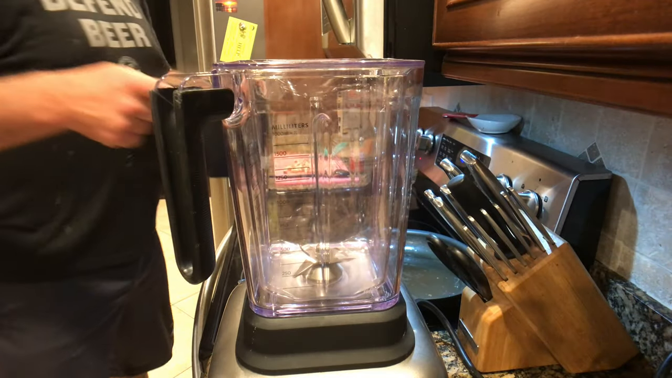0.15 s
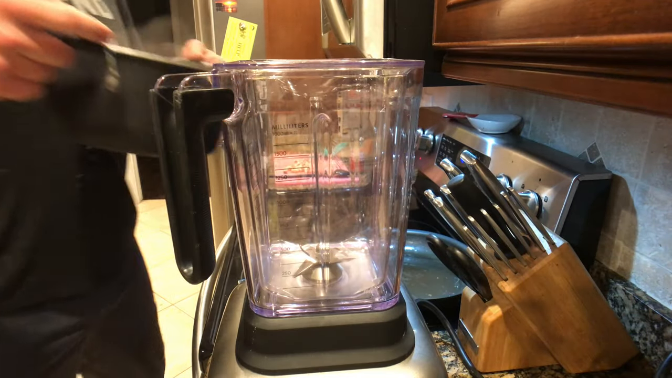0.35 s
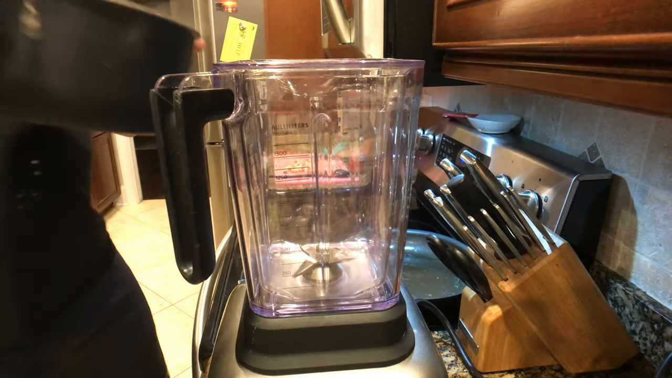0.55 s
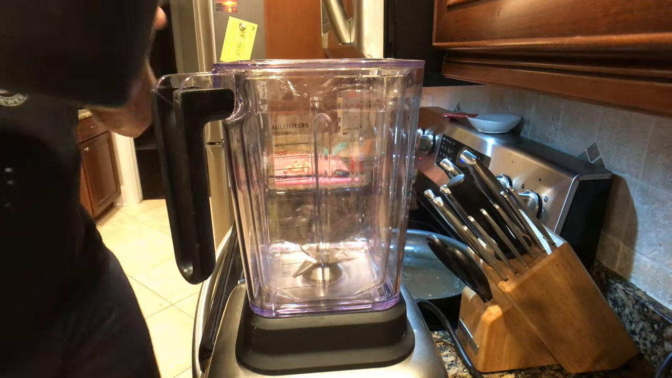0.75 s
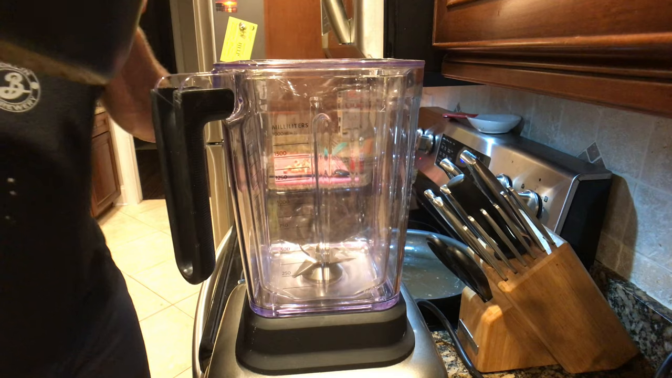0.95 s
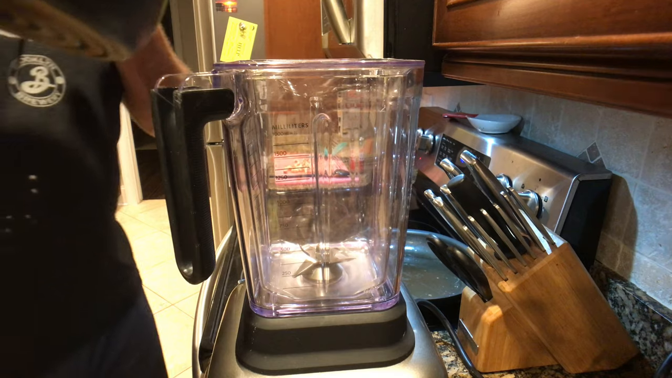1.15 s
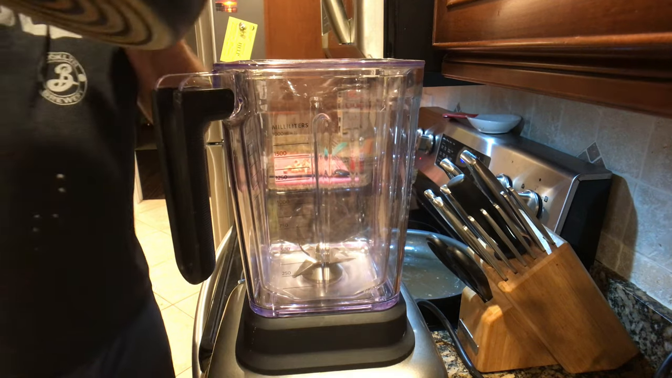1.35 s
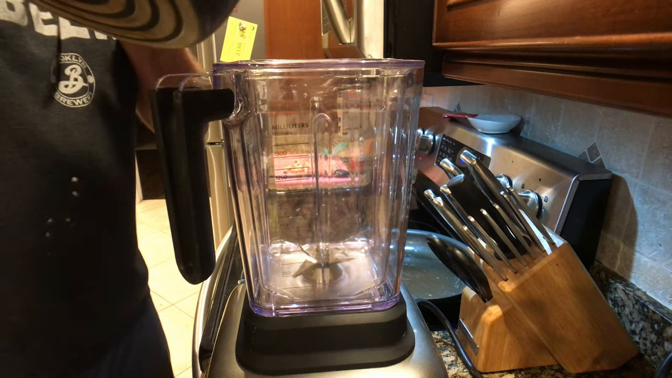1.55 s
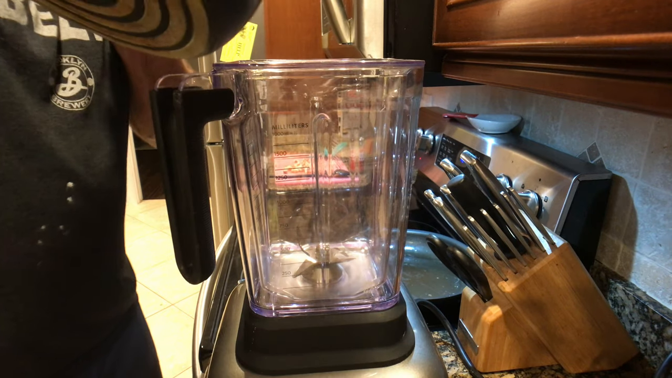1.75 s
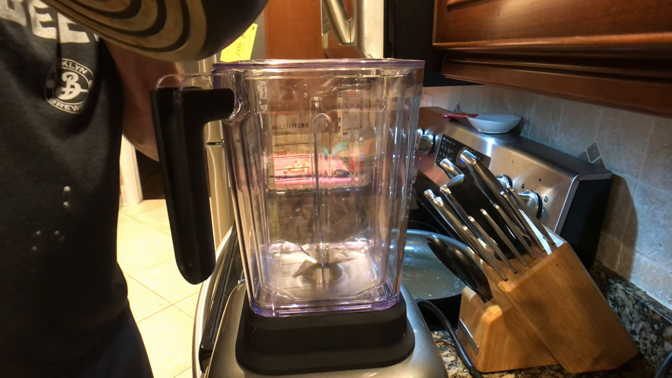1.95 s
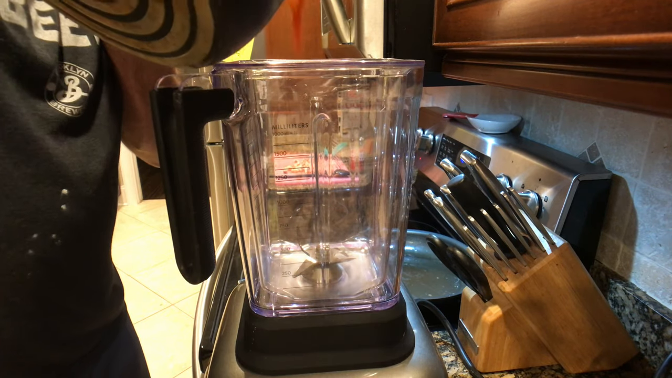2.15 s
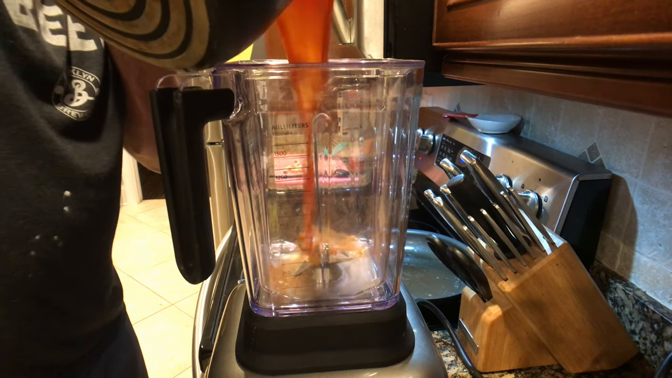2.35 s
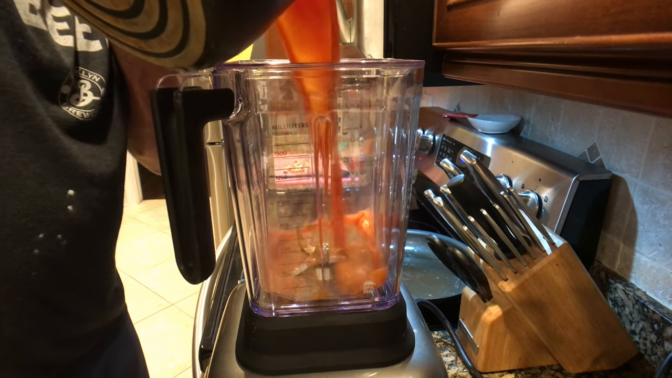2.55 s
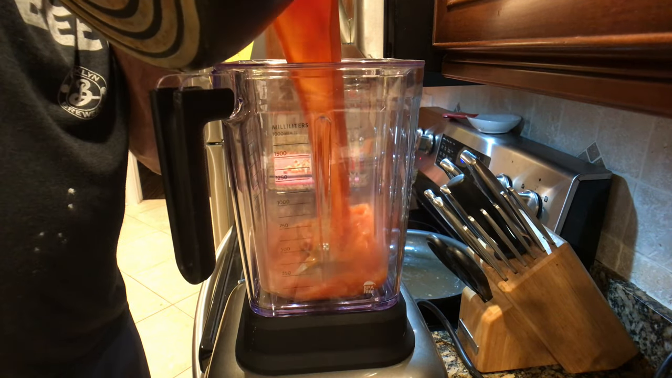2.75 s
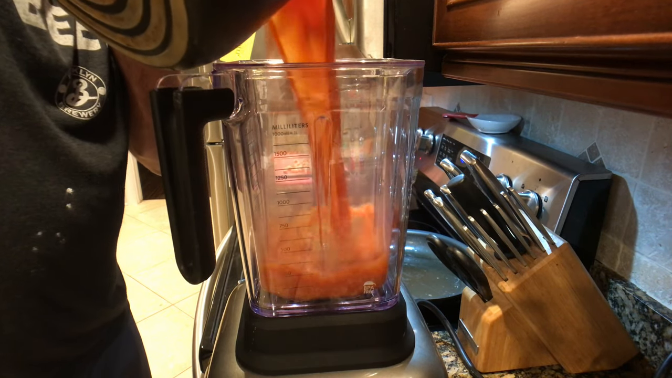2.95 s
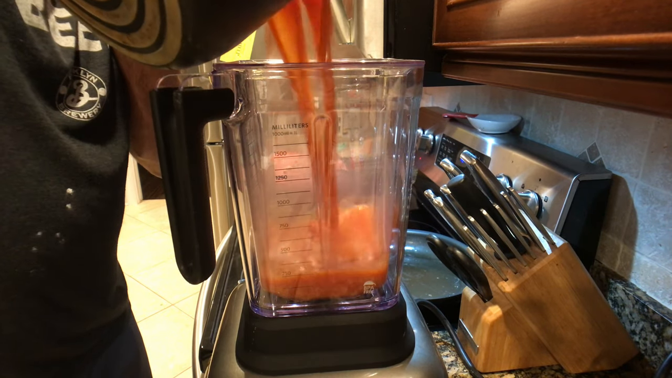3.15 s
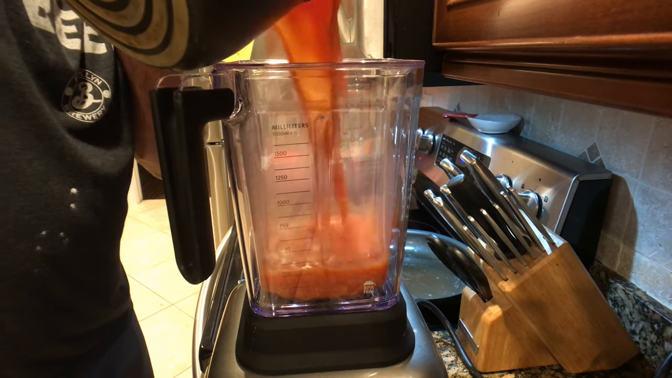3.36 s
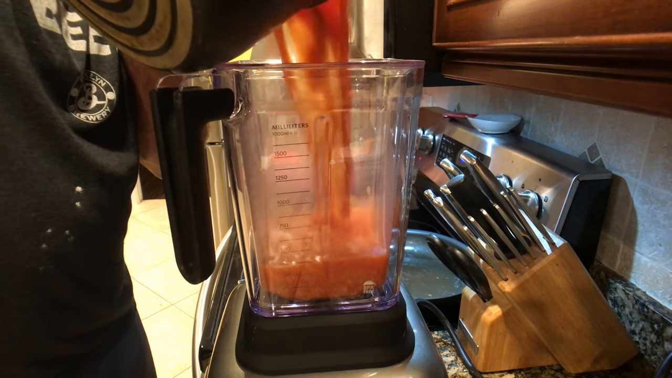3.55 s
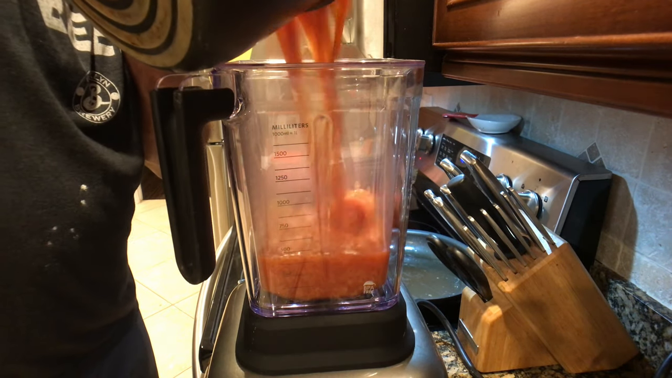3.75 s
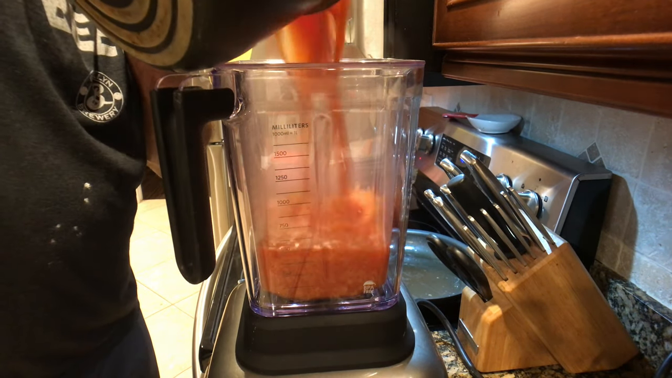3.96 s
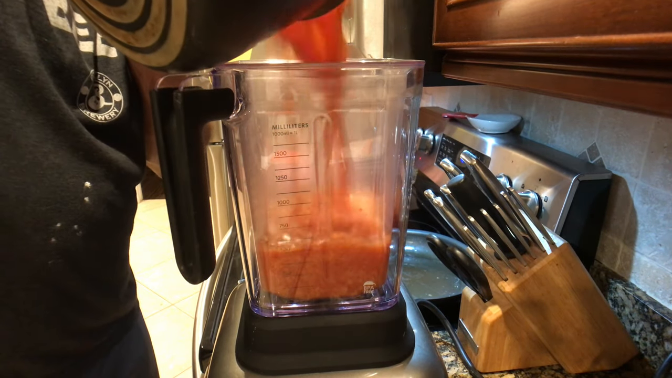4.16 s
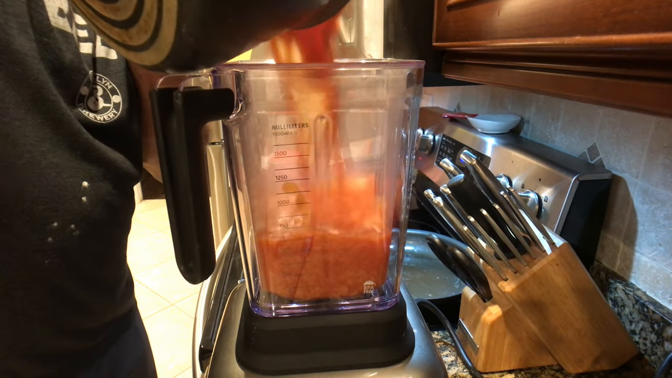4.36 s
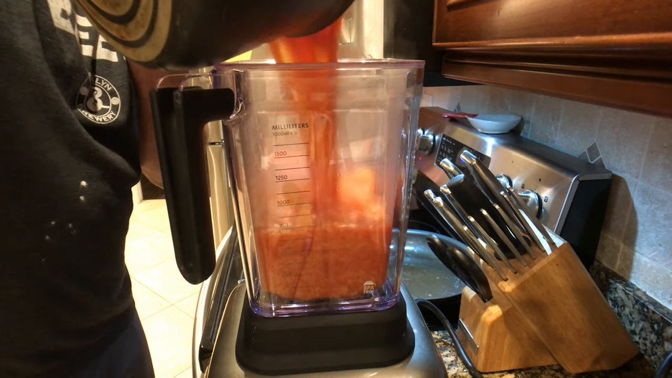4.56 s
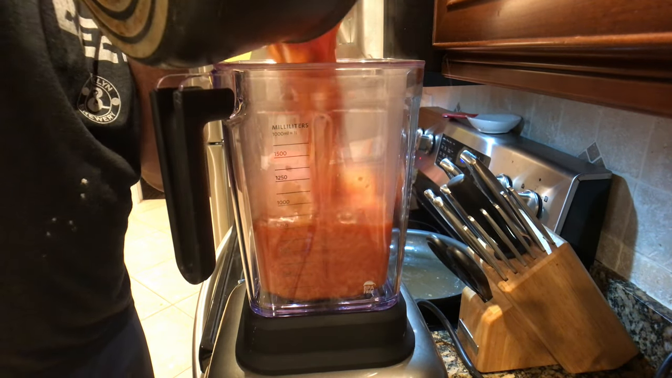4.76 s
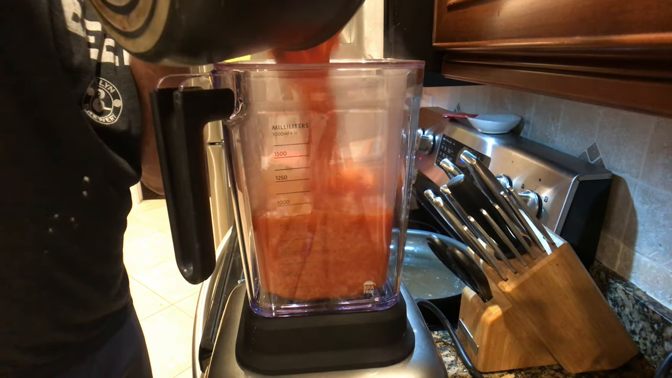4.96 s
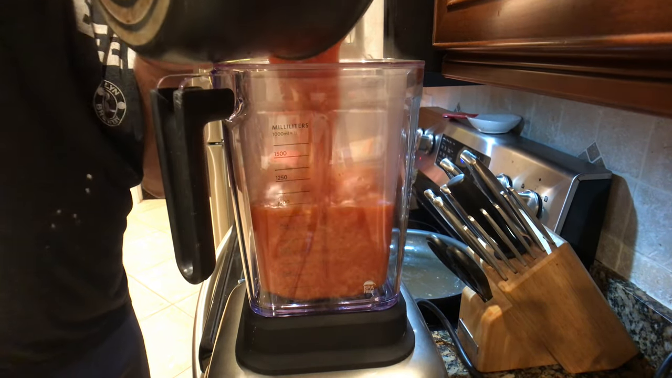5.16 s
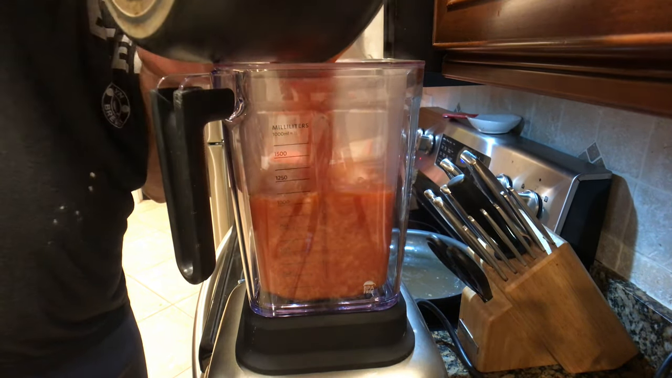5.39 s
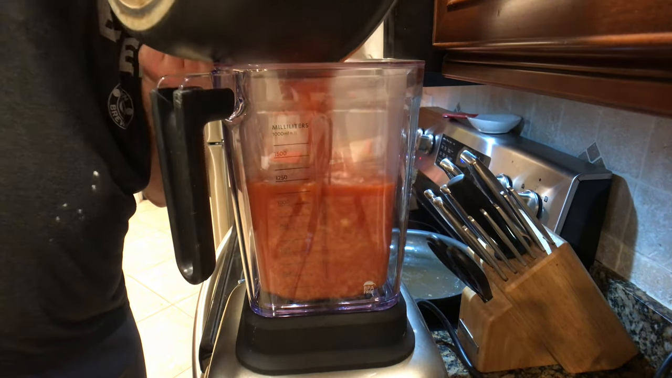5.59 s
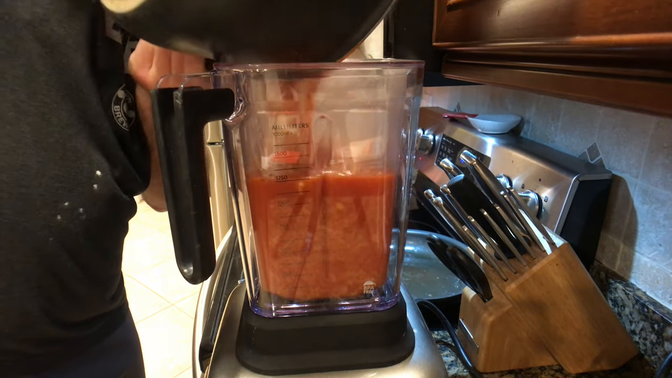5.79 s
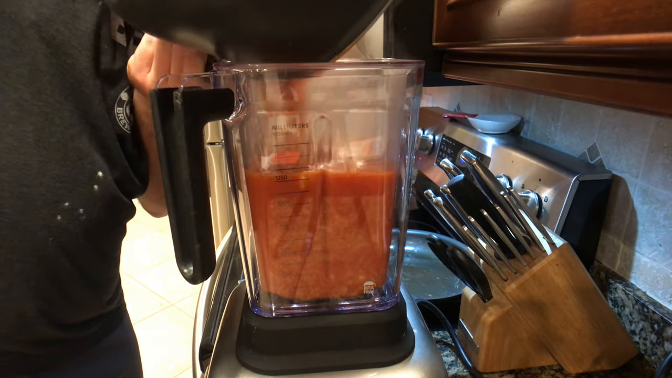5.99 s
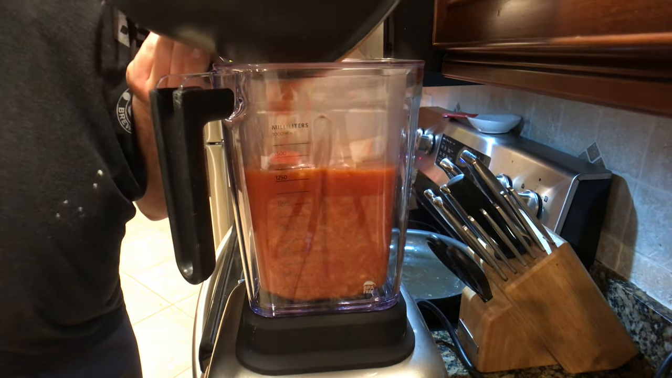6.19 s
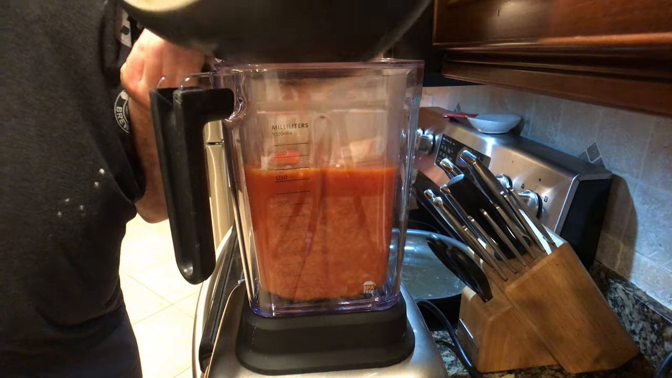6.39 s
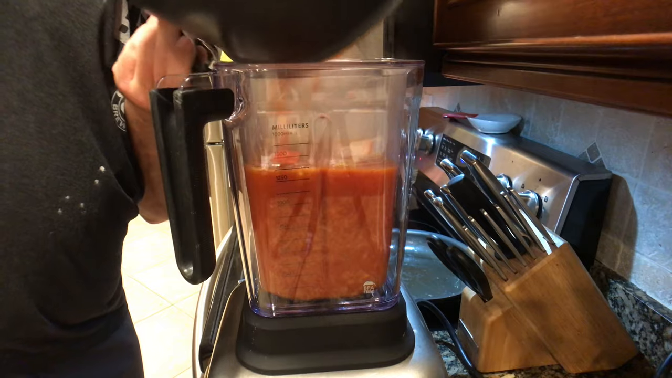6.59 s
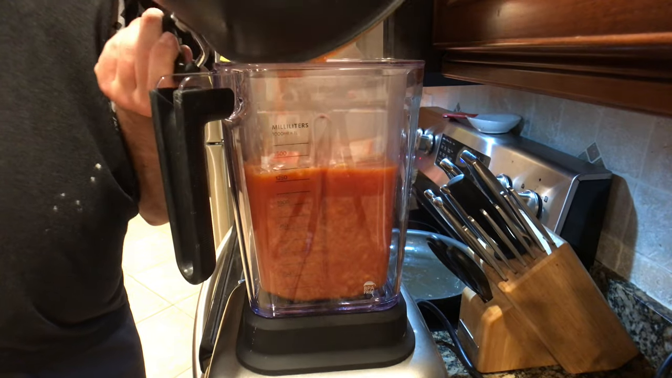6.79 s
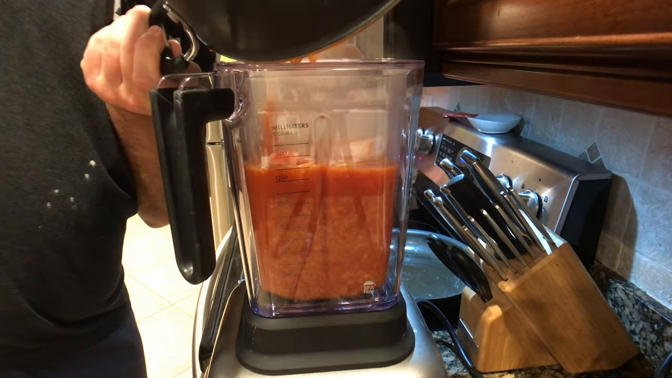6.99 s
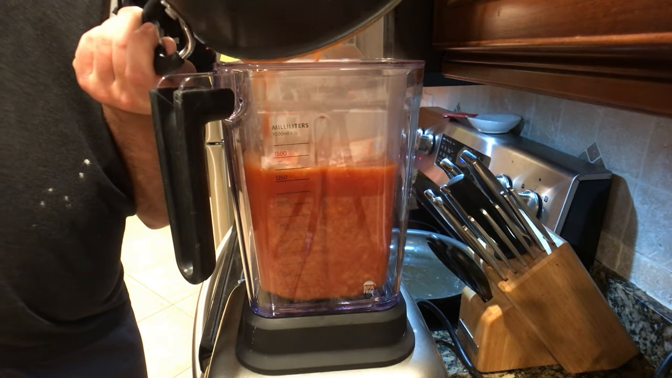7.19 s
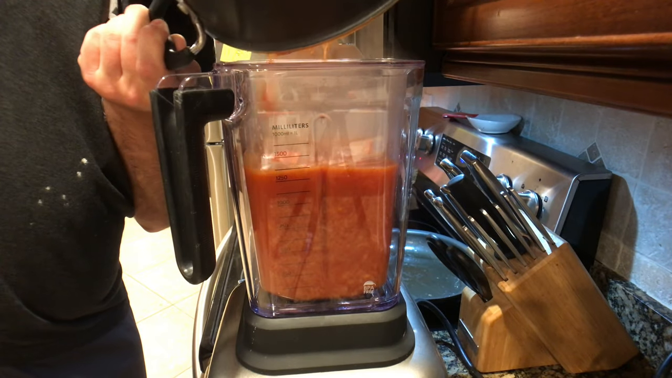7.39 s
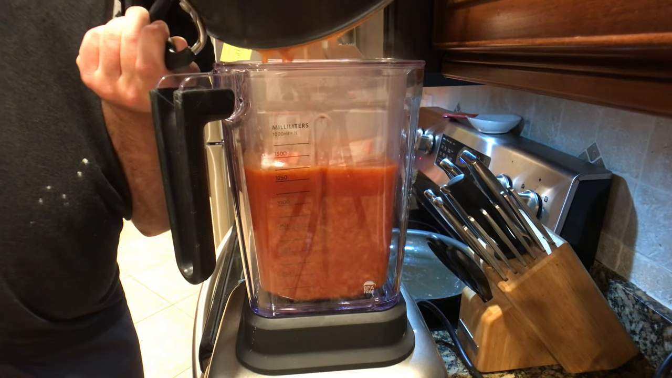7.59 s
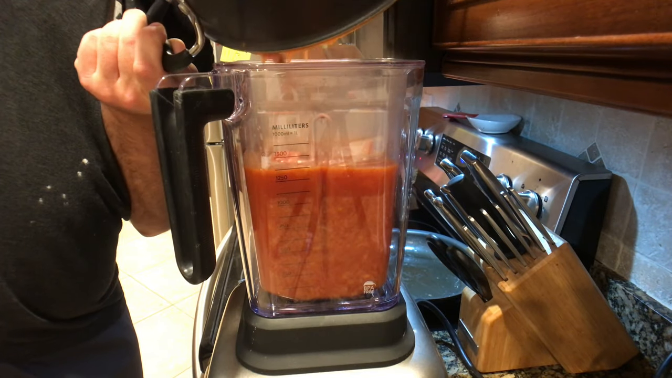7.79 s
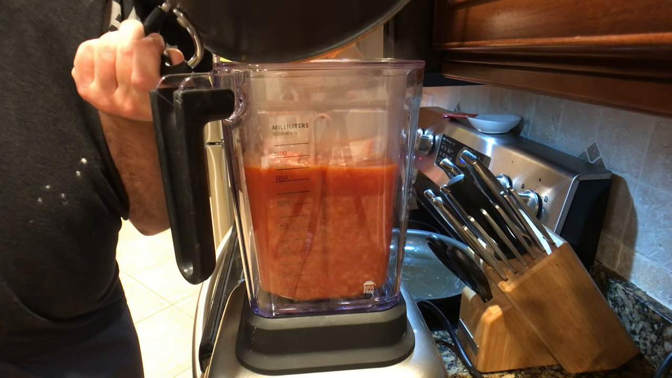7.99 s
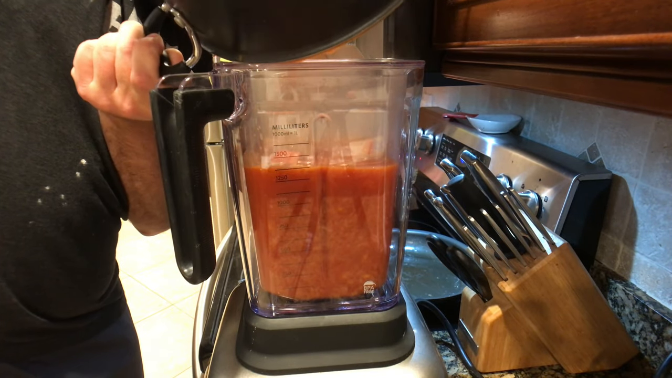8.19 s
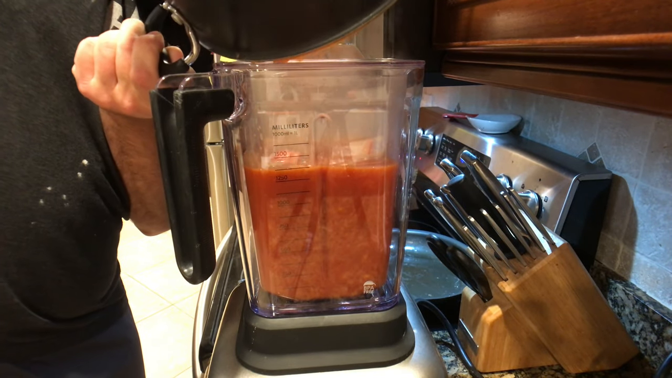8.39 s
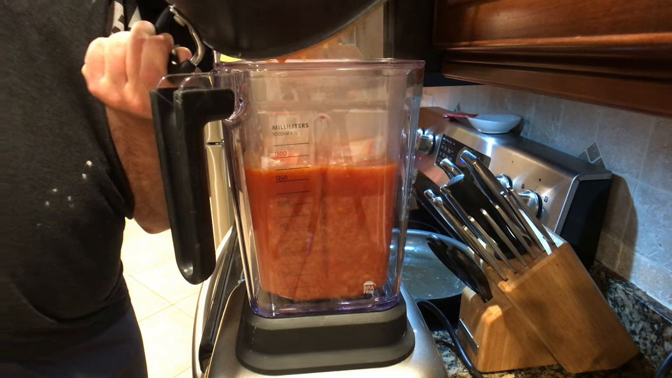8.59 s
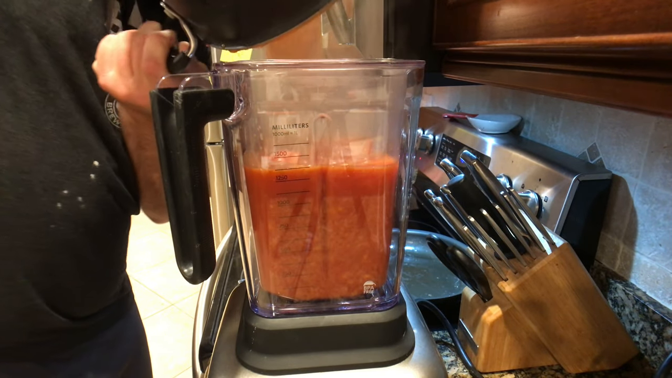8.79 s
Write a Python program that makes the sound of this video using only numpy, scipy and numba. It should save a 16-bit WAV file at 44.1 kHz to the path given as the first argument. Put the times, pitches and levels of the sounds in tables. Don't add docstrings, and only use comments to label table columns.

```python
import sys
import numpy as np
from scipy import signal
from scipy.fft import rfft, irfft
from scipy.io import wavfile
from scipy.ndimage import uniform_filter1d
from numba import njit

SR = 44100
rng = np.random.default_rng(int(sys.argv[2]) if len(sys.argv) > 2 else 0)


def dump_mix(stems):
    frames = np.atleast_2d(stems).T
    limited = np.clip(frames, -1, 1)
    pcm = np.round(limited * 32767).astype(np.int16)
    wavfile.write(sys.argv[1], SR, pcm)


def gain_from_decibels(decibels):
    exponent = np.asarray(decibels, float) / 20
    return 10 ** exponent


N = 389844

# (pitch [Hz], level [dB per Hz])
DROPLET_COLOUR = [(1470, 2), (3040, 10), (4720, 12), (6990, 7.5), (8180, 8), (11800, -11), (15200, -20.5),
                  (16300, -86)]
# (time [s], spray peak [dB], droplet pitch [Hz], pocket level [dB])
SINGLE_DROPS = [(5.4926, -16.5, 3380, -34), (5.5358, -16, 4100, -26.5), (5.61, -22, 5500, -31),
                (5.624, -9, 9200, -28), (5.6722, -15.5, 6100, -31), (5.686, -12, 4200, -25.5),
                (5.7584, -12.5, 5100, -28), (5.8, -21.5, 4560, -27.5), (5.8632, -25, 5090, -35),
                (5.9033, -25.5, 4900, -29.5), (5.9752, -23, 4600, -25.5), (5.9966, -25.5, 4970, -30),
                (6.0468, -21.5, 5100, -35), (6.1022, -23.5, 4050, -30), (6.1727, -24, 6800, -43),
                (6.255, -23.5, 8800, -34.5), (6.4177, -25.5, 6100, -41.5), (6.4651, -61, 4000, -33.5),
                (6.527, -32, 4470, -41), (6.733, -30, 5200, -41), (6.769, -21, 4230, -53),
                (6.786, -31, 5100, -29), (6.947, -59, 3000, -33), (7.037, -29, 5150, -37),
                (7.0985, -24.5, 7000, -24), (7.293, -21, 4600, -19.5), (7.4715, -23, 8300, -33),
                (7.918, -43, 3910, -43)]
BREAK_FROM_S, BREAK_TO_S = 5.4, 6.1


def rms_one(x):
    return x / np.sqrt(np.mean(x ** 2) + 1e-20)


def in_time(rows):
    s, *columns = np.transpose(rows)
    return [np.interp(np.arange(N) / SR, s, column) for column in columns]


def held(times, values):
    latest = np.searchsorted(times, np.arange(N) / SR, "right") - 1
    return np.asarray(values)[np.maximum(latest, 0)]


def drift(rate):
    r = np.exp(-80 * np.pi * rate / SR)
    slow = signal.lfilter([1], [1, -2 * r, r * r], rng.standard_normal(N // 40 + 2002))
    slow = slow[2000:]
    return np.interp(np.arange(N) / 40, np.arange(len(slow)), rms_one(slow - slow.mean()))


def colour(x, spectrum):
    hz = np.maximum(np.fft.rfftfreq(8192, 1 / SR), 1)
    table_hz, table_db = np.transpose(spectrum)
    log_gain = np.interp(np.log(hz), np.log(table_hz), table_db) * np.log(10) / 20
    cepstrum = irfft(log_gain)
    cepstrum[1:4096] *= 2
    cepstrum[4097:] = 0
    kernel = irfft(np.exp(rfft(cepstrum)))
    return signal.fftconvolve(x, kernel / np.sqrt(np.sum(kernel ** 2)))[:len(x)]


def resonate(x, peaks):
    out = 0
    for k, (hz, width, db) in enumerate(peaks):
        r = np.exp(-np.pi * width / SR)
        a = [1, -2 * r * np.cos(2 * np.pi * hz / SR), r * r]
        b = np.array([1, 0, -1]) * (1 - r * r) / 2
        out = out + (-1) ** k * gain_from_decibels(db) * signal.lfilter(b, a, x + 1e-18)
    return out


@njit
def glide(x, hz, width_hz, sr):
    r = np.exp(-np.pi * width_hz / sr)
    y = np.zeros(len(x))
    for i in range(2, len(x)):
        push = (1 - r * r) / 2 * (x[i] - x[i - 2])
        y[i] = push + 2 * r * np.cos(2 * np.pi * hz[i] / sr) * y[i - 1] - r * r * y[i - 2]
    return y


def grains(per_s, spread_db, clump_db):
    sizes = gain_from_decibels(spread_db * np.minimum(rng.exponential(1, N), 4)) * rng.choice([-1, 1], N)
    born = rng.random(N) < per_s / SR
    return rms_one(sizes * born * gain_from_decibels(clump_db * drift(9.6)))


def dying(starts, decay_ms):
    return signal.lfilter([1], [1, -np.exp(-1000 / (decay_ms * SR))], starts)


def blips(per_s, low_hz, high_hz, cycles, spread_db, clump_db, puff_ms):
    sizes = np.abs(grains(per_s, spread_db, clump_db))
    dealt = rng.integers(0, 14, N)
    white, out = rng.standard_normal(N), 0
    for k, hz in enumerate(np.geomspace(low_hz, high_hz, 14)):
        puffs = white * dying(sizes * (dealt == k) + 1e-18, puff_ms)
        peak = [(hz, hz / cycles, 0)]
        out = out + resonate(resonate(puffs, peak), peak)
    return rms_one(out)


def bursts(times, levels_db, decay_ms, carrier):
    starts = np.zeros(N)
    starts[(np.asarray(times) * SR).astype(int)] = gain_from_decibels(np.asarray(levels_db))
    return carrier * dying(starts, decay_ms)


def bubbles(times, levels_db, pitches_hz, cycles, rise):
    out, t = np.zeros(N + 4096), np.arange(4096) / SR
    for s, db, hz in zip(times, levels_db, pitches_hz):
        turns, start = hz * t, int(s * SR)
        swell_and_fade = np.exp(-turns / cycles) * np.minimum(turns, 1)
        ring = np.sin(2 * np.pi * turns * (1 + rise * turns))
        out[start:start + len(t)] += gain_from_decibels(db) * swell_and_fade * ring
    return out[:N]


def background():
    # (pitch [Hz], level [dB per Hz])
    air_colour = [(9, -18), (16, 10.5), (60, -11), (215, -24), (1530, -31.5), (1990, -39), (5060, -92.5),
                  (14500, -115)]
    # (pitch [Hz], width [Hz], level [dB])
    casing_rings = [(219.4, 17, -66.5), (345.5, 4.6, -73.5), (417.3, 11, -66.5), (447.3, 8, -69),
                    (539, 42, -71.5), (1490, 7.1, -79.5), (3120, 64, -81.5)]
    air_db, hum_hz, hum_db = -47.5, 119.5, -53.5
    air = gain_from_decibels(air_db) * colour(rng.standard_normal(N), air_colour)
    hum = gain_from_decibels(hum_db + 1.5 * drift(14)) * np.sin(2 * np.pi * hum_hz * np.arange(N) / SR)
    white, casing = rng.standard_normal(N), 0
    for hz, width, db in casing_rings:
        casing = casing + gain_from_decibels(db) * rms_one(resonate(white, [(hz, width, 0)]))
    return air + hum + casing


def kitchen(x):
    t60_s, wall_cut_hz = 0.34, 4800
    out, dull = np.zeros(N), np.exp(-2 * np.pi * wall_cut_hz / SR)
    lags = (rng.uniform(.009, .035, 10) * SR).astype(int)
    for k, lag in enumerate(lags):
        loop, gain, state = x.copy(), gain_from_decibels(-60 * lag / SR / t60_s), [0.]
        for i in range(lag, N, lag):
            back, state = signal.lfilter([gain * (1 - dull)], [1, -dull], loop[i - lag:i], zi=state)
            loop[i:i + lag] += back[:N - i]
        out += (loop - x) * (-1) ** k
    return out


def whistles():
    # (start [s], end [s], start pitch [Hz], end pitch [Hz], level [dB])
    tones = [
        (6.54, 6.62, 10200, 10100, -72),
        (6.62, 6.65, 4400, 4400, -66),
        (7.13, 7.19, 8200, 8400, -70),
        (7.17, 7.3, 9500, 7800, -71),
        (7.17, 7.29, 13100, 11800, -85),
        (8.59, 8.71, 7050, 7050, -81),
    ]
    out, waver = np.zeros(N), gain_from_decibels(4.0 * drift(60))
    for start, end, start_hz, end_hz, db in tones:
        along = np.linspace(0, 1, int((end - start) * SR))
        phase = 2 * np.pi * np.cumsum(start_hz + (end_hz - start_hz) * along ** 1.9) / SR
        first = int(start * SR)
        out[first:first + len(along)] += gain_from_decibels(db) * np.sin(np.pi * along) ** .5 * np.sin(phase)
    return out * waver


def fizz():
    # (time [s], level [dB])
    hiss_curve = [(0.6, -63), (1.05, -62.5), (2.15, -62.5), (6.5, -60.5), (7.42, -60.5), (7.58, -65)]
    # (pitch [Hz], level [dB per Hz])
    hiss_colour = [(2500, 1.5), (3500, 6), (5000, 11.5), (7000, 6), (9000, -1.5), (12000, -14.5),
                   (16000, -21)]
    # (time [s], peak level [dB])
    froth_pops = [
        (0.2694, -34),
        (0.828, -26),
        (0.8909, -45),
        (1.0794, -35),
        (1.228, -31),
        (1.4341, -32.5),
        (1.5474, -31.5),
        (1.63, -57),
        (1.8114, -35),
        (1.904, -66),
    ]
    # (time [s],
    # peak level [dB], pitch [Hz])
    film_ticks = [(6.349, -35, 4450), (6.377, -35, 7400), (6.4923, -28, 6900), (6.651, -31, 1960),
                  (6.667, -34, 5200), (6.692, -26.5, 8000), (6.876, -32.5, 9300), (6.912, -31.5, 2380),
                  (6.99, -45, 6500), (7.006, -29, 9600), (7.0197, -27, 5900), (7.05, -35, 7000),
                  (7.515, -24, 7340), (7.5256, -28, 4070), (7.8085, -44.5, 8000), (7.8309, -34, 7700),
                  (7.947, -30.5, 8100), (7.962, -36, 4790), (8.336, -52.5, 4600), (8.3689, -35, 5070),
                  (8.568, -41, 3180), (8.5788, -32, 3260), (8.591, -38, 2770)]
    froth_hz = 5100
    heard = np.interp(np.arange(N) / SR, [2.4, 2.6, 6.2, 6.35], [1, 0, 0, 1])
    hiss = blips(12000, 2500, 14000, cycles=3.0, spread_db=1.0, clump_db=.8, puff_ms=5.0)
    hiss = heard * gain_from_decibels(in_time(hiss_curve)[0] - 1.5) * hiss
    s, db = np.transpose(froth_pops)
    tick_s, tick_db, tick_hz = np.transpose(film_ticks)
    white = rng.standard_normal(N)
    swell = uniform_filter1d(bursts(s + 0.0017, db - 25.0, decay_ms=96.0, carrier=0.63), size=800)
    froth = white * swell * gain_from_decibels(2.2 * drift(25))
    ticks = bursts(tick_s, tick_db - 8, decay_ms=2.5, carrier=white)
    pitched = glide(ticks, held(tick_s, tick_hz), 6000.0, SR)
    ticks = gain_from_decibels(-8.5) * pitched + gain_from_decibels(-16.0) * np.diff(ticks, prepend=0)
    rings = bubbles(s, db - 17.0, froth_hz * rng.uniform(1.0, 1.6, len(s)), cycles=11.0, rise=0.00063)
    rings += bubbles(tick_s, tick_db - 13.0, tick_hz, cycles=8.0, rise=0.0005)
    return colour(hiss + froth, hiss_colour) + colour(ticks, DROPLET_COLOUR) + rings


def knocks():
    # (time [s], peak level [dB], contact time [ms], crack level [dB])
    hits = [
        (0.709, -39, 1.5, -51),
        (2.217, -21.5, 0.8, -33.5),
        (2.223, -19, 1.1, -39),
        (6.755, -28, 1.4, -27),
        (8.4741, -16.5, 1.6, -30.5),
        (8.579, -41, 0.62, -30.5),
        (8.574, -11.5, 63, -54),
    ]
    # (pitch [Hz], level [dB], time to fade by 60 dB [s])
    hit_rings = [
        [(1000, 0, 0.022)],
        [(276, 8.5, 0.038), (351, -6, 0.28), (410, -4, 0.063), (1490, -27, 0.05)],
        [(130, 12.6, 0.065), (65.3, 2.4, 0.305)],
        [(15.25, 0.5, 1.47), (71, 10.5, 0.16), (267, -10, 0.13), (441, -14, 0.28), (1440, -3, 0.046),
         (4400, -14, .05)],
        [(69.5, 5.5, 0.076), (242, 2, 0.018), (451, -14, 0.17), (485, -10, 0.19), (2120, -19, 0.016),
         (726, -19, 0.038), (1480, -31.5, 0.22), (4420, -30, 0.068), (28.2, -8, 0.79)],
        [(1110, 3, 0.04), (1390, 5, 0.025)],
        [(86.1, 4.5, 0.28), (158, -7.5, 0.187), (215.7, -9, 0.217), (290, -19, 0.19), (630, -29, 0.22)],
    ]
    # (pitch [Hz], width [Hz], level [dB])
    crack_colour = [(308, 140, 10.5), (740, 490, 2), (2050, 830, -8), (4600, 1800, -15)]
    out, t = np.zeros(N + SR), np.arange(SR // 2) / SR
    for (s, db, contact_ms, _), modes in zip(hits, hit_rings):
        start = int(s * SR)
        for k, (hz, level_db, t60) in enumerate(modes):
            swell = 1 - np.exp(-t / (contact_ms / 1000 + 0.9 / hz))
            ring = (-1) ** k * gain_from_decibels(db + level_db - 60 * t / t60) * np.sin(2 * np.pi * hz * t)
            out[start:start + len(t)] += ring * swell
    s, _, _, crack_db = np.transpose(hits)
    crack = bursts(s, crack_db, decay_ms=15.0, carrier=rng.standard_normal(N))
    return out[:N] + resonate(crack, crack_colour)


def follow(flow_db, full_db, share, lack_db, pool_s, deepen_db):
    flow_full_db, flow_start_s = -46, 2.4
    t = np.maximum(np.arange(N) / SR - flow_start_s, 0)
    bare_bottom = lack_db * np.exp(-(t / pool_s) ** 2)
    return full_db + share * (flow_db - flow_full_db) - bare_bottom + deepen_db * t


def slaps():
    # (time [s], spray peak [dB], bubble level [dB], bubble pitch [Hz])
    lumps = [(2.438, -25, -31.5, 1810), (2.6908, -26, -33, 1620), (2.8292, -20.5, -23, 1790),
             (3.699, -37, -28, 1390), (2.9831, -16, -30.5, 1630), (3.0384, -27, -16.5, 1990),
             (3.063, -18, -26.5, 1236), (3.1103, -14, -26.5, 1190), (3.4445, -17, -29, 2080),
             (3.4724, -10.5, -28, 2440), (3.495, -36, -27, 1980), (3.52, -14.5, -29, 2000),
             (3.7435, -15, -31, 2060), (3.764, -12.5, -32, 2050), (3.8992, -14, -28, 2040),
             (4.004, -14, -26.5, 1980), (4.0392, -15, -20, 2000), (4.152, -32, -23.5, 2510),
             (4.1936, -7, -16.5, 2080), (4.3669, -10, -32.5, 2080), (4.516, -40, -31.5, 1440),
             (4.59, -14.5, -25.5, 1650), (4.7214, -16, -24, 1424), (4.843, -10.5, -31.5, 1620),
             (3.967, -15.5, -27, 1800), (5.0177, -31, -22, 1870), (5.0385, -11.5, -28.5, 1690),
             (5.0882, -9, -28, 1760), (5.1817, -14, -19, 1850), (5.273, -20.5, -25.5, 1700)]
    lump_spray_hz = [5260, 4380, 6230, 4700, 5150, 4700, 2770, 2840, 4260, 5970, 4700, 5800, 5900, 6230,
                     5140, 5070, 3910, 3000, 4200, 3630, 4700, 2830, 4670, 5650, 3870, 4000, 4030, 4950,
                     4560, 5100]
    # (time [s], spray peak [dB], droplet pitch [Hz])
    splats = [(2.4127, -27, 7300), (2.4826, -34, 5000), (2.5837, -22.5, 5340), (2.6105, -17.5, 3120),
              (2.717, -16.5, 4420), (2.781, -13.5, 3460), (2.8609, -16, 6400), (2.8766, -13.5, 6400),
              (2.945, -23, 5630), (3.299, -14.5, 4700), (3.371, -13.5, 3570), (3.424, -23, 3620),
              (3.564, -19.5, 5100), (3.5973, -26, 5800), (3.7954, -17.5, 4900), (3.8204, -15.5, 4800),
              (4.9246, -19.5, 4550), (3.942, -9, 4600), (4.1377, -18, 4420), (4.436, -22, 4130),
              (4.457, -16, 4960), (4.4916, -18.5, 4180), (4.5623, -16.5, 3620), (4.757, -15.5, 7100),
              (4.816, -14, 4270), (4.9506, -9, 7700), (5.311, -12, 4400), (5.336, -10, 4840),
              (5.391, -10.5, 4370), (5.4402, -14, 5300)]
    # (time [s], peak level [dB], droplet pitch [Hz])
    flecks = [(2.361, -32, 5760), (2.424, -29, 5190), (2.4893, -25, 5100), (2.5294, -26, 3840),
              (2.6853, -21, 4040), (2.8102, -18, 5000), (2.9354, -22.5, 5600), (2.959, -21, 5700),
              (2.6012, -43, 8500), (2.7446, -25, 4500), (3.241, -19.5, 5450), (3.436, -13.5, 4500),
              (3.701, -33, 4400), (5.75, -21, 6040), (5.883, -33, 5000), (6.1224, -25.5, 4870),
              (3.6484, -21.5, 4900), (3.664, -18.5, 5760), (3.674, -23.5, 3040), (3.6894, -22, 3080),
              (3.833, -24, 3110), (3.8747, -22, 4130), (3.891, -23, 3220), (4.0155, -20, 4170),
              (4.0594, -25, 3190), (4.071, -19.5, 4610), (4.0894, -33, 4000), (4.171, -19, 4100),
              (4.249, -23, 3880), (4.265, -16, 8050), (4.28, -21, 4900), (4.448, -29, 4500),
              (5.1302, -29, 4960), (5.3774, -17, 5000), (4.3894, -23, 4340), (4.427, -22, 4200),
              (4.5405, -19, 4220), (4.6177, -15, 4660), (4.6608, -24.5, 4840), (4.727, -11.5, 5200),
              (5.0224, -16, 3990), (5.0599, -18, 4670), (5.192, -17, 3460), (5.2054, -13.5, 5600),
              (5.241, -21, 6160), (5.262, -16, 4950)]
    # (time [s], peak level [dB], pitch [Hz])
    plops = [(2.361, -46, 1970), (2.42, -49, 1900), (2.4795, -29, 2110), (2.49, -31, 2050),
             (2.5508, -35, 1850), (2.613, -32.5, 2380), (2.6866, -24.5, 1490), (2.7814, -28.5, 1830),
             (2.8067, -21, 2070), (2.907, -23, 1205), (2.9297, -27, 1620), (2.942, -22.5, 2050),
             (3.0734, -20.5, 1410), (3.1018, -25, 1240), (3.2042, -29.5, 1100), (3.2196, -27, 1960),
             (3.24, -24.5, 1210), (3.298, -26.5, 1850), (3.3767, -26, 1290), (3.3992, -27, 1100),
             (3.4308, -25.5, 1870), (3.5628, -24, 2080), (3.707, -21, 1310), (3.8107, -25.5, 2050),
             (3.8722, -27, 2120), (3.942, -27, 1340), (4.094, -29, 2030), (4.137, -24.5, 2510),
             (4.28, -31.5, 1490), (4.3993, -27.5, 1520), (4.4463, -30, 1440), (4.4893, -35, 1490),
             (4.505, -25, 1390), (4.5241, -20.5, 1390), (4.6637, -28, 1480), (4.6983, -38, 1480),
             (4.8256, -28, 1780), (4.896, -27, 1440), (4.9252, -22.5, 2080), (4.945, -22, 1610),
             (4.993, -29, 1860), (5.2545, -28, 1880), (5.309, -24, 2050), (5.389, -24.5, 1800),
             (5.4334, -25.5, 1800)]
    # (time [s], peak level [dB], pitch [Hz])
    drop_plops = [(5.4905, -28, 1900), (5.534, -38, 1370), (5.6097, -37, 1830), (5.62, -37, 1860),
                  (5.6727, -26, 1740), (5.6854, -27, 1800), (5.7517, -36, 1530), (5.7985, -37, 1520),
                  (5.8815, -39, 1110), (5.905, -38.5, 1100), (5.9753, -42, 1090), (5.996, -34, 1660),
                  (6.0436, -36.5, 1030), (6.101, -46, 1120), (6.1738, -42, 1790), (6.2538, -34, 1700),
                  (6.419, -45, 1770), (6.4642, -51, 1480), (6.9452, -41, 1055), (7.0357, -39, 1075),
                  (7.11, -32, 1800), (7.293, -30, 1220), (7.471, -35, 2470)]
    fleck_gain_db, plop_gain_db = -0.5, -6.5
    sprays = [(row[0], row[1], hz) for row, hz in zip(lumps, lump_spray_hz)]
    sprays += splats + [row[:3] for row in SINGLE_DROPS]
    sprays += [(s, db + fleck_gain_db, hz) for s, db, hz in flecks]
    trapped = [(s, db, hz) for s, _, db, hz in lumps]
    trapped += [(s, db + plop_gain_db, hz) for s, db, hz in plops + drop_plops]
    return np.transpose(sorted(sprays)), np.transpose(sorted(trapped))


def spatter(flow):
    sizes = np.abs(grains(190, spread_db=2.5, clump_db=1.5))
    puffs = dying(sizes + 1e-18, decay_ms=2.9)
    return flow * rms_one(puffs * rng.standard_normal(N))


def spray(flow, sprays, spattered):
    lump_droplet_hz, shower_rise_s, spatter_db = 4700, 0.0033, -5
    drop_snap_db, drop_shower_db, drop_tuned_db = 4.5, -3, -7
    s, slap_db, spray_hz = sprays
    t = np.arange(N) / SR
    tick = bursts(s, slap_db - 13.5, decay_ms=1.1, carrier=np.sign(rng.standard_normal(N)))
    droplets = blips(2500, 2800, 12960, cycles=2.7, spread_db=2.2, clump_db=0.0, puff_ms=3.0)
    shower = bursts(s, slap_db - 16.5, decay_ms=9.94, carrier=droplets)
    shower *= 1 - np.exp(-(t - held(s, s)).clip(0) / shower_rise_s)
    broken = np.interp(t, [BREAK_FROM_S, BREAK_TO_S], [0, 1])
    tick = gain_from_decibels(drop_snap_db * broken) * tick
    shower = gain_from_decibels(drop_shower_db * broken) * shower
    tuned, size_hz = shower + tick, held(s, spray_hz)
    for _ in range(2):
        tuned = glide(tuned, size_hz, 2000.0, SR)
    tuned = gain_from_decibels(2.0 + drop_tuned_db * broken) * tuned
    fine = gain_from_decibels(-2.5) * blips(2000, 2400, 14000, cycles=4.0, spread_db=2.0, clump_db=1.5, puff_ms=5.0)
    wandering_hz = np.clip(lump_droplet_hz * gain_from_decibels(3.5 * drift(40)), 2000, 12000)
    sized = glide(spattered, wandering_hz, 2500.0, SR)
    fine = flow * (fine + gain_from_decibels(spatter_db) * (0.13 * spattered + 1.5 * sized))
    bright = colour(fine + gain_from_decibels(1.5) * tick + gain_from_decibels(-1.5) * shower + tuned, DROPLET_COLOUR)
    return signal.sosfilt(signal.butter(2, 1300, "high", fs=SR, output="sos"), bright)


def gurgle(flow, trapped, spattered):
    # (pitch [Hz], width [Hz], level [dB])
    cross_rings = [(1190, 240, -2.5), (1400, 120, 5), (1800, 87, 5), (2080, 79, 6), (2510, 72, -2)]
    spatter_low_db = 4.5
    s, bubble_db, bubble_hz = trapped
    small = flow * blips(800, 940, 2520, cycles=4.7, spread_db=4.0, clump_db=2.5, puff_ms=2.3)
    puffs = bursts(s, bubble_db + 6.0, decay_ms=4.5, carrier=rng.standard_normal(N))
    puffs = puffs * gain_from_decibels(0.84 * drift(120))
    tuned = glide(puffs, held(s, bubble_hz), 300.0, SR)
    drive = gain_from_decibels(spatter_low_db) * flow * spattered + gain_from_decibels(-0.5) * small + gain_from_decibels(2.5) * puffs
    rings = bubbles(s, bubble_db + 7.5, bubble_hz, cycles=4.24, rise=0.0035)
    return gain_from_decibels(-13.5) * small + resonate(drive, cross_rings) + tuned + rings


def glugs(flow, rumble_flow):
    # (time [s], pitch [Hz])
    air_curve = [(2.3, 462), (3.2, 583), (4.5, 596), (5.2, 604), (6.1, 800), (7.5, 755)]
    # (time
    # [s], peak level [dB], pitch [Hz], thump level [dB])
    big_pockets = [(2.832, -27, 800, -65), (3.121, -17.5, 520, -47), (3.191, -22.5, 653, -77),
                   (3.238, -23, 575, -67), (3.303, -26.5, 355, -37), (3.38, -27, 356, -65),
                   (3.443, -24.5, 603, -49), (3.562, -25, 340, -38), (3.7, -18, 425, -25.5),
                   (3.847, -21, 430, -33), (3.969, -18.5, 453, -63), (4.037, -14.5, 672, -22.5),
                   (4.19, -15.5, 411, -23), (4.277, -21.5, 583, -60), (4.446, -19.5, 425, -25.5),
                   (4.49, -18, 458, -20), (4.589, -23, 593, -22.5), (4.722, -33, 580, -22),
                   (4.825, -24, 620, -73), (4.847, -16.5, 441, -20.5), (4.893, -23, 473, -27),
                   (4.949, -17.5, 690, -21), (5.037, -24, 630, -23), (5.088, -27.5, 456, -26),
                   (5.287, -22.5, 600, -47), (5.381, -22.5, 702, -33), (5.3, -23, 418, -42),
                   (5.44, -22, 478, -38), (6.753, -30, 507, -32)]
    # (time [s], peak level [dB], pitch [Hz])
    small_pockets = [(3.34, -30, 348), (3.399, -22, 560), (3.468, -26, 560), (3.619, -28.5, 570),
                     (3.81, -35, 610), (4.069, -23.5, 240), (4.127, -28, 570), (4.341, -33, 595),
                     (4.37, -29, 430), (4.519, -26, 600), (4.549, -20.5, 590), (4.616, -37, 643),
                     (4.636, -24.5, 630), (5.151, -42, 640), (5.189, -30, 694), (5.257, -39, 686),
                     (5.884, -29.5, 800), (6.138, -33, 450), (6.284, -35, 810)]
    # (pitch [Hz], width [Hz], level [dB])
    wall_rings = [(441, 9.8, 7.5), (340, 13.7, -5.5), (299.4, 18, -1)]
    # (pitch [Hz], width [Hz], level [dB])
    low_rings = [(140, 18.5, 9), (81.5, 26, 5.5), (217, 33, -14)]
    drop_thump_db, pocket_lag_s, pocket_over_air = -23.5, .0006, 0.97
    gulp_gain_db, gulp_thump_db = 1.5, -12
    wall_peak_s, wall_peak_db = 3.655, 9.5
    wall_rise_db_per_s, wall_fall_db_per_s = 36.5, 7.5
    air_hz, past_peak = in_time(air_curve)[0], np.arange(N) / SR - wall_peak_s
    drops = []
    for s, _, _, db in SINGLE_DROPS:
        drops.append((s + pocket_lag_s, db, pocket_over_air * air_hz[int(s * SR)], db + drop_thump_db))
    gulps = [(s, db + gulp_gain_db, hz, db + gulp_thump_db) for s, db, hz in small_pockets]
    s, glug_db, glug_hz, thump_db = np.transpose(big_pockets + drops + gulps)
    pockets = flow * blips(700, 233, 942, cycles=3.95, spread_db=-0.5, clump_db=3.0, puff_ms=3.8)
    puffs = bursts(s, glug_db + 11.5, decay_ms=4.0, carrier=rng.standard_normal(N))
    drive = gain_from_decibels(13.0) * pockets + puffs
    air = glide(drive, air_hz, 190.0, SR)
    air = signal.sosfilt(signal.butter(2, 1800, fs=SR, output="sos"), air)
    wall_db = wall_peak_db - np.maximum(-wall_rise_db_per_s * past_peak, wall_fall_db_per_s * past_peak)
    walls = gain_from_decibels(wall_db) * resonate(signal.lfilter([.15], [1, -.85], drive), wall_rings)
    rumble = rumble_flow * gain_from_decibels(21.5) * grains(500, spread_db=2.0, clump_db=5.0)
    rumble = resonate(rumble, low_rings)
    rumble = signal.sosfilt(signal.butter(2, 75, "high", fs=SR, output="sos"), rumble)
    thumps = bubbles(s, thump_db + 1.5, np.full(len(s), 138.0), cycles=2.7, rise=0.00086)
    rings = bubbles(s, glug_db - 2.5, glug_hz, cycles=3.6, rise=0.005)
    return gain_from_decibels(-6.5) * pockets + air + walls + rumble + thumps + rings


def counter_sway():
    sway_db, from_s, to_s, edge_db_per_s = -47, 4.6, 6.42, 14
    t, peak = np.arange(N) / SR, [(51.8, 86, 0)]
    sway = rms_one(resonate(resonate(rng.standard_normal(N), peak), peak))
    outside_s = np.maximum(np.maximum(from_s - t, t - to_s), 0)
    return gain_from_decibels(sway_db - edge_db_per_s * outside_s) * sway


def soup():
    # (time [s], level [dB])
    stream_curve = [(2.25, -43), (2.45, -56), (2.7, -48), (3.4, -44.5), (4.03, -45.5), (5.06, -47),
                    (5.22, -46), (5.82, -50.5), (6.36, -64), (6.6, -105)]
    t = np.arange(N) / SR
    flowing = np.interp(t, [2.3, 2.47, 6.45, 6.65], [0, 1, 1, 0])
    flow_db = in_time(stream_curve)[0]
    sprays, trapped = slaps()
    middle = flowing * gain_from_decibels(follow(flow_db, -26.5, share=0, lack_db=27, pool_s=0.95, deepen_db=-10))
    large = flowing * gain_from_decibels(follow(flow_db, -39.5, share=2.5, lack_db=15.5, pool_s=2.27, deepen_db=-2.5))
    deep = flowing * gain_from_decibels(follow(flow_db, -41.5, share=1.5, lack_db=8.5, pool_s=2.3, deepen_db=1))
    middle = middle * np.interp(t, [BREAK_FROM_S, BREAK_TO_S], [1, 0])
    small = spatter(flowing)
    splashes = spray(flowing * gain_from_decibels(flow_db), sprays, small) + gurgle(middle, trapped, small)
    return splashes + glugs(large, deep) + counter_sway()


def scene():
    near = soup() + fizz() + knocks() + whistles()
    return (near + gain_from_decibels(-19.5) * kitchen(near) + background())[None]


def band_limit(x):
    return signal.sosfilt(signal.butter(12, 16470, fs=SR, output="sos"), x)


def record(dry):
    top_cut = signal.ellip(10, .5, 70, 15900, fs=SR, output="sos")
    mix = signal.sosfilt(top_cut, dry)
    return band_limit(mix)


dry = scene()
out = record(dry)
dump_mix(out)
```